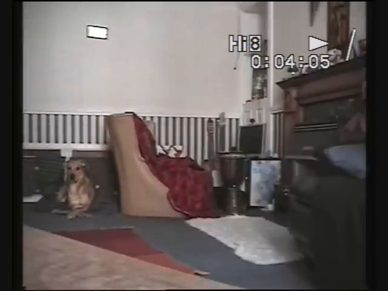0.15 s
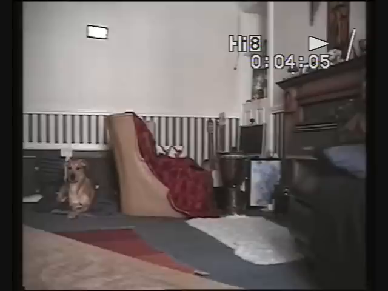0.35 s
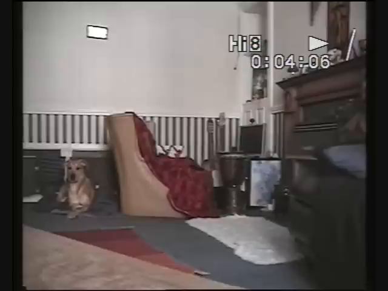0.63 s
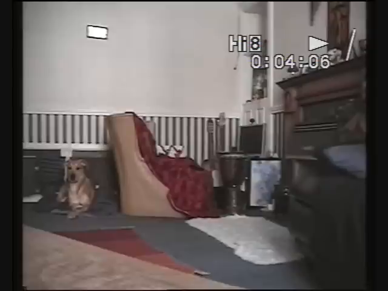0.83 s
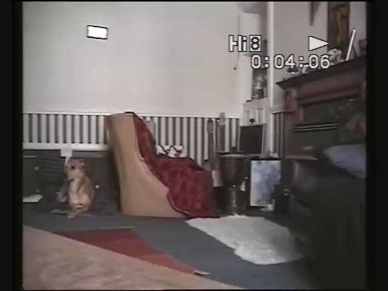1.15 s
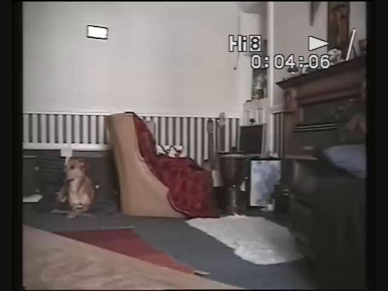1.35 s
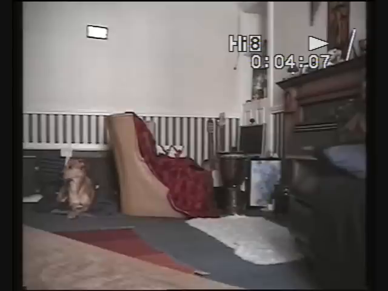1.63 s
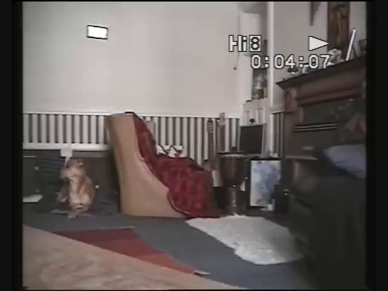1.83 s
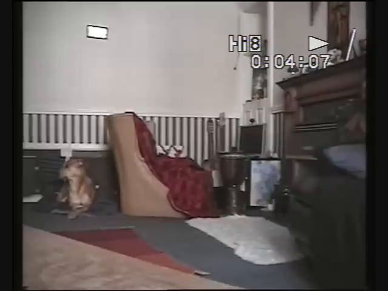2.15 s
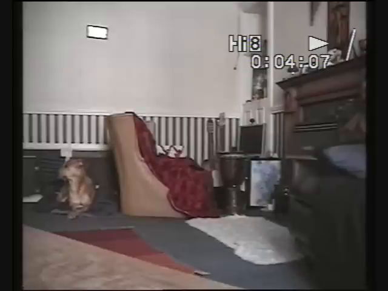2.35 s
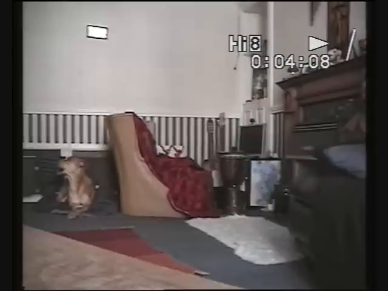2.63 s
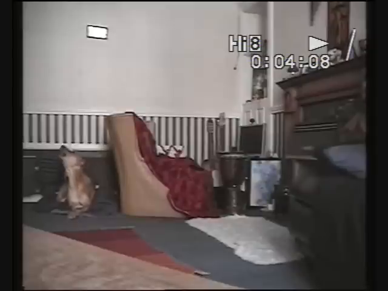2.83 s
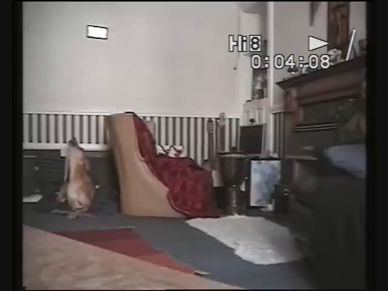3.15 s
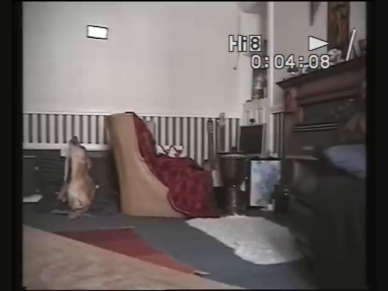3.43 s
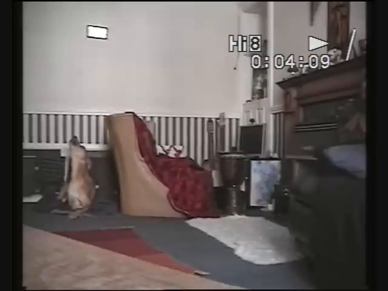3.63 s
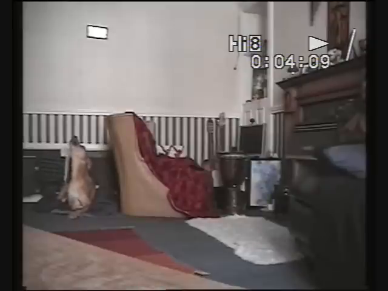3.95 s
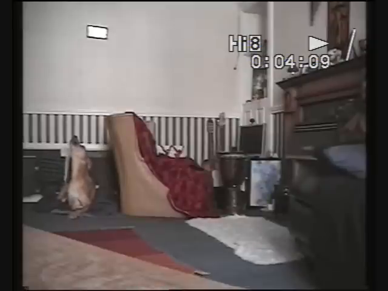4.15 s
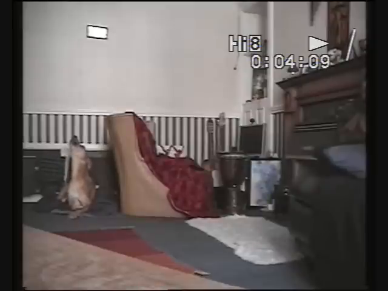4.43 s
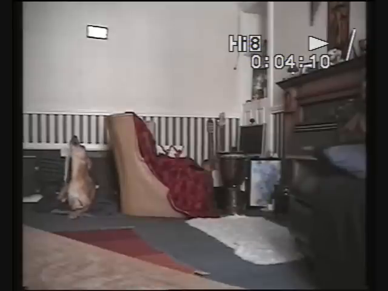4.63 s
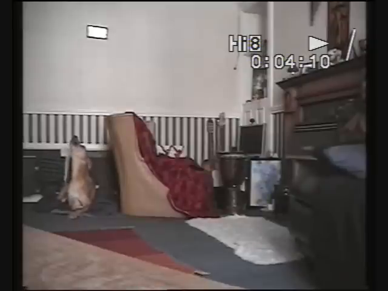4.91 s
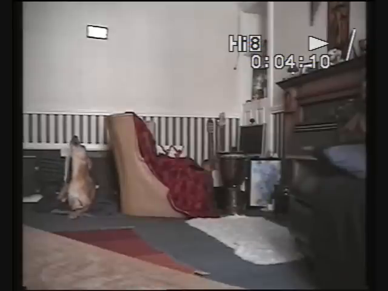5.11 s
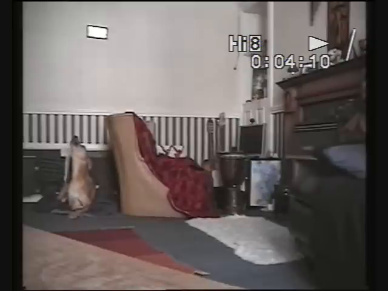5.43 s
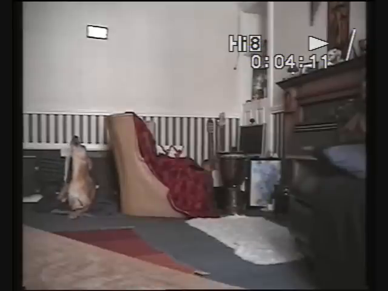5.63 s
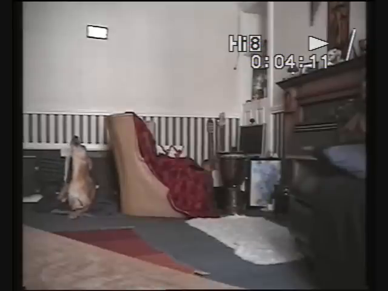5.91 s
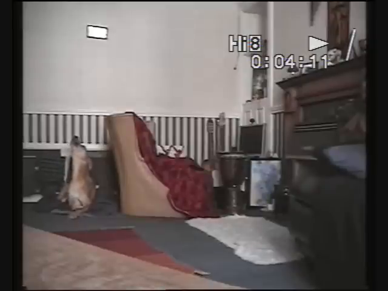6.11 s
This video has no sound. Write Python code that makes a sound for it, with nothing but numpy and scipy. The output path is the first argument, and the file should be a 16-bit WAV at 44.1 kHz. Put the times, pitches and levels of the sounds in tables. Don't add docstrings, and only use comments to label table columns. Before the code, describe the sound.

Steady tape hiss, a faint drive drone and a very high thin buzz run throughout, in the right channel, with the left almost silent. From 0 to 1.3 seconds, claws and tags tick irregularly; faint high nose whistles appear near 0.3, 0.4 and 1.1, with little whimpers around 0.65 and 1.05. Two breathy whines follow at 1.2 to 1.75, the second longer and sinking. At 1.9 a low creaky growl starts the near dog's howl, wavering, lifting slightly by 2.9, dipping, then swooping up from 3.5 to a high crest at 4 to 4.4, before falling sharply and fading at 5.1. The farther dog starts roughly at 2.6, leaps upward by 3, flutters briefly, then holds a slowly sinking note that fades until 6.3. The loudest peaks, near 2.9 to 3.2, 3.6 and 4.5, crackle with overload. A few ticks sound closer at 5.5 and 6.1. Short living-room reverberation.

```python
import sys
import numpy as np
from scipy import signal
from scipy.fft import rfft, irfft, next_fast_len
from scipy.io import wavfile
from scipy.ndimage import uniform_filter1d, minimum_filter1d

SR = 44100
rng = np.random.default_rng(int(sys.argv[2]) if len(sys.argv) > 2 else 0)


def to_linear_factor(level_db):
    exponent = np.asarray(level_db, float) / 20
    return 10 ** exponent


def bounce(signal):
    frames = np.transpose(np.atleast_2d(signal))
    limited = np.clip(frames, -1, 1)
    pcm = np.round(limited * 32767).astype(np.int16)
    wavfile.write(sys.argv[1], SR, pcm)


N = 276811

# (time [s], pitch [Hz], effort [dB], mouth opening [1 = rest], brightening pressure [dB])
GLIDING_CALL = [(1.93, 333, -59, 1, 1.5), (1.978, 335.7, -55, 1.36, -0.5), (1.988, 334.3, -39, 1.27, -2.5),
                (2.02, 334.3, -41, 1.18, -1.5), (2.045, 316, -55.5, 1.25, 15.5),
                (2.075, 308.3, -39, 0.91, 7), (2.15, 312.6, -35, 1.19, -3), (2.17, 314.8, -45.5, 0.81, 10),
                (2.25, 317.5, -41, 0.76, 5), (2.275, 322.7, -34.5, 0.94, -4),
                (2.305, 323.7, -32, 0.94, -3.5), (2.36, 322.8, -36, 0.95, 3),
                (2.48, 325.5, -39.5, 1.03, 2.5), (2.525, 336.8, -41, 1.12, 3.5),
                (2.545, 345.3, -33, 1.3, -3)]
GLIDING_LIFT = [(2.572, 354, -31, 1.045, -12), (2.61, 349.4, -41.5, 0.97, -5.5),
                (2.646, 348.6, -35, 1.03, -9), (2.686, 366.8, -25, 1.13, -14), (2.726, 374, -35, 1.39, -8),
                (2.76, 385.8, -31.5, 1.02, -1.5), (2.78, 391.3, -38, 1.16, -7.5),
                (2.81, 394.3, -33, 1.23, -3), (2.873, 399, -30.5, 1.01, -2.5),
                (2.9, 389.4, -36.5, 0.93, -3), (2.935, 366.1, -28, 0.96, -4.5),
                (2.965, 371.5, -40, 1.02, -5.5), (2.991, 361, -58, 0.82, 3)]
GLIDING_RISE = [(3.051, 339.6, -35, 0.98, -12), (3.157, 343.9, -37, 0.88, 3),
                (3.42, 337.5, -34, 0.87, -10.5), (3.501, 367.5, -25, 1.163, -11),
                (3.56, 392.6, -30.5, 0.93, -1.5), (3.624, 429.5, -27.5, 1.007, 3),
                (3.665, 445.7, -42, 1.07, -7), (3.75, 479.1, -46.5, 0.75, 2.5)]
GLIDING_CREST = [(3.859, 513.4, -47, 1.17, 8), (3.93, 552.5, -38.5, 1.06, -2),
                 (4.001, 580.7, -33.5, 0.9, -3.5), (4.089, 582.2, -37, 1.1, -3.5),
                 (4.23, 586.9, -36, 1.22, -3.5), (4.381, 590.9, -36.5, 1.11, -1.5)]
GLIDING_FALL = [(4.43, 575, -39, 1.06, 16), (4.499, 513.3, -29, 1.116, 6.5), (4.569, 449.3, -24, 1.04, -2),
                (4.61, 423.3, -28.5, 1.098, -17), (4.651, 397.5, -30, 0.95, -1.5),
                (4.705, 381, -37, 0.91, -5.5), (4.755, 365.7, -42, 1.06, -2),
                (4.81, 356, -43.5, 0.98, -2.5), (4.86, 355.5, -43, 0.96, -5.5),
                (4.945, 365.8, -45, 1.11, -1), (5.015, 384, -40.5, 0.9, 3), (5.072, 364.8, -45, 1.03, -1),
                (5.095, 370, -76.5, 1.15, -1)]
HELD_RISE = [(2.59, 263.7, -62, 0.83, -7.5), (2.64, 256.4, -44.5, 0.9, -12),
             (2.73, 252.2, -44.5, 0.94, -16.5), (2.78, 276.9, -43, 0.8, -16), (2.86, 331.4, -28, 0.93, -15),
             (2.9, 393.5, -33, 0.85, -9), (2.935, 478, -35, 1, 7.5), (2.97, 508.2, -32, 0.86, 10.5),
             (3.0, 516.5, -37, 0.89, 14.5), (3.06, 503.2, -32.5, 0.94, 6.5)]
HELD_NOTE = [(3.3, 511.3, -38, 0.94, 10.5), (3.579, 505.5, -36, 1, 8), (3.691, 503.7, -31, 1.14, 0),
             (3.81, 498.8, -32, 1.04, -2), (3.999, 487.8, -37, 1, 0.5), (4.29, 469.4, -37, 0.92, 1),
             (4.47, 464.8, -38, 0.92, 3.5), (4.571, 464, -32.5, 1.135, -13.5),
             (4.679, 469.4, -36.5, 0.9, -2.5), (4.8, 457.2, -37.5, 1.1, 1.5),
             (5.03, 450.6, -38.5, 1.16, -4.5), (5.12, 450, -37, 1.135, -6.5), (5.2, 450, -34.5, 1.196, -9)]
HELD_FADE = [(5.4, 450.3, -37, 1.196, -6.5), (5.49, 443.8, -39.5, 1.13, -8), (5.53, 442.6, -42.5, 1.28, -8),
             (5.63, 442.2, -42, 1.176, -9), (5.798, 440.7, -40.5, 1.24, -9.5),
             (5.94, 433, -47.5, 1.08, 3.5), (6.03, 427.2, -51, 0.99, 8), (6.088, 415, -41, 0.94, -7),
             (6.197, 409.5, -48, 1.33, -4), (6.279, 395, -47, 0.64, 2.5)]
UNDERTONE = [
    (2.63, 180.6, -61, 0.85, -21),
    (2.68, 189, -45.5, 0.9, -16),
    (2.74, 206, -46.5, 0.97, -21),
    (2.79, 214, -59.5, 0.9, -21),
]
# (frequency [Hz], level [dB])
GLIDING_MOUTH = [(250, -19.5), (330, -11), (420, -2), (650, 4.5), (900, -16), (1200, -13), (1500, -29.5),
                 (1800, -37.5)]
HELD_MOUTH = [(180, -14), (300, -10.5), (430, 2), (540, 1), (850, -20.5), (1050, -11.5), (1300, -21),
              (1600, -28)]
WHINE_MOUTH = [(400, -0.5), (560, -2), (680, -4), (850, -27), (1060, -21), (1300, -27.5), (1700, -42.5)]
# (frequency [Hz], level [dB])
GLIDING_THROAT = [(1200, 8), (1500, -13.5), (1900, -2), (2550, -24), (2900, -4.5), (3500, -43),
                  (4800, -32.5), (5300, -9), (5900, -23.5), (6700, -11.5), (7400, -31), (8100, -18),
                  (9000, -49)]
HELD_THROAT = [(1200, 3), (1770, -1), (2050, -21.5), (2550, -10), (3300, -10), (3650, -36.5), (4600, -45.5),
               (5100, -27), (5700, -27), (6500, -39.5), (7700, -20.5), (8300, -33.5), (8900, -38.5),
               (9500, -47.5), (12200, -54)]
WHINE_THROAT = [(1200, -12), (2100, -2), (2500, -14), (3000, 0), (3800, -42), (5400, -8.5), (6600, -7),
                (8000, -29.5)]
# (time [s], spread [s], frequency [Hz], spread [Hz], lift [dB])
GLIDING_SWELLS = [(2.12, 0.062, 1246, 120.4, 4.5), (2.84, 0.1, 1515, 130, 22.5),
                  (2.91, 0.081, 1110, 390, 11.5), (3.59, 0.21, 1223, 170, 14), (3.86, 0.055, 991, 114, 27.5),
                  (4.42, 0.029, 1174, 110, 17), (4.48, 0.011, 1567, 190, 13.5), (4.57, 0.07, 878, 53, 12),
                  (4.56, 0.13, 1788, 238, 20.5), (4.2, 0.26, 5500, 1200, -14.5), (4.47, .07, 6300, 1200, -9),
                  (2.51, 0.013, 665, 63, -1), (2.32, 0.081, 645, 70, 3), (2.14, 0.027, 625, 70, 1.5),
                  (3.163, 0.16, 343, 30, 5), (4.33, 0.11, 2940, 150, 13.5), (4.268, 0.11, 1170, 120, 6.5),
                  (2.2, 0.077, 2880, 150, 13), (2.29, 0.037, 1930, 120, 12), (2.12, 0.057, 1870, 120, -9),
                  (2.2, 0.038, 640, 70, -9), (2.2, 0.055, 950, 80, 8.5), (4.4, 0.088, 2100, 150, -11.5),
                  (3.3, 0.18, 6750, 270, 4.5), (2.56, .03, 2120, 120, 11.5), (2.4, .05, 2800, 200, -1),
                  (5.0, .05, 1500, 100, 16), (4.86, 0.061, 1075, 80, -3.5), (3.17, .08, 685, 40, 7.5),
                  (3.3, 0.19, 1020, 50, 6), (4.7, 0.032, 390, 50, 3)]
HELD_SWELLS = [(3.0, 0.05, 3080, 150, 9.5), (3.575, 0.021, 3040, 150, 8), (4.33, .14, 5160, 200, 13),
               (4.33, 0.11, 6200, 200, 10.5), (4.71, 0.06, 5150, 250, 16), (4, .08, 5480, 200, 10),
               (3.15, .2, 11500, 300, 25), (3.55, .25, 11200, 300, 19), (6.4, .12, 3100, 120, 8),
               (5.3, 0.13, 3150, 120, 5.5), (6.1, .2, 3240, 170, -14), (3.3, 0.17, 2030, 80, -10),
               (3.4, 0.044, 1600, 820, -6.5), (3.25, .2, 7650, 300, -7.5), (4.12, .25, 7650, 300, 7),
               (3.75, .15, 5520, 200, 5), (3.3, 0.17, 3800, 120, 3.5), (4.6, 0.37, 2310, 140, -11),
               (4.87, 0.067, 2750, 140, 0.5), (4.3, 0.045, 2840, 103, 17), (6.04, 0.06, 3047, 100, 20.5),
               (5.65, 0.11, 885, 80, 6.5), (5.246, 0.22, 900, 80, -10.5), (3.4, 0.068, 1780, 100, -9.5),
               (5.5, 0.27, 2650, 120, -7), (3.15, 0.079, 2040, 100, 12.5), (4.7, 0.093, 2900, 330, -16),
               (8.8, 0.11, 3230, 170, -17), (3.0, .04, 5150, 200, 7.5)]
WHINE_SWELLS = [(1.453, 0.039, 1065, 80, 8.5), (1.58, 0.027, 1000, 150, -14), (1.58, 0.028, 1450, 150, -6),
                (1.27, .04, 1850, 120, 5), (1.66, .04, 2080, 100, 9), (1.64, .06, 2950, 200, -1),
                (1.74, 0.036, 830, 80, -13)]
PRESSURE_SHARES = (0, 0.34, 0.82)
# (multiple of a third of the pitch, level [dB])
THIRDS = [(4, -63.5), (7, -57.5), (10, -65)]
# (multiple of the pitch, level under the line above [dB])
FLUTTER_LINES = [(.25, -30.5), (1.5, -16), (1.75, -14), (2.25, -15), (2.5, -20), (2.75, -18), (3.25, -28),
                 (5.75, -40), (6.25, -28.5), (6.5, -29)]
# (time [s], pulse rate [1/s], level [dB], mouth resonance [Hz])
GROWLS = [
    [(1.9, 120, -74, 410), (1.94, 158, -54, 465), (1.97, 185, -47.5, 496), (2.01, 130, -48.5, 538),
     (2.04, 130, -60.5, 517), (2.2, 140, -54.5, 480)],
    [(2.6, 140, -57, 520), (2.66, 140, -70, 510), (2.72, 410, -59.5, 505.5), (2.78, 150, -58, 499.7),
     (2.84, 230, -79, 605)],
]
# (time [s], pitch [Hz], effort [dB], mouth opening [1 = rest], brightening pressure [dB])
WHINES = [
    [(1.21, 526, -82, 1, 7), (1.25, 604, -40.5, 0.8, 10), (1.295, 664, -41.5, 0.89, 9),
     (1.32, 566.4, -45.5, 0.96, 6), (1.355, 555, -36, 0.79, -8), (1.378, 548, -43, 0.87, 4),
     (1.39, 543, -51, 0.94, 14), (1.412, 550, -47, 1, 10)],
    [(1.408, 553, -55, 1.2, 1), (1.424, 538, -39, 0.92, 0), (1.44, 538, -36.5, 0.71, -1.5),
     (1.458, 536, -43.5, 0.78, 4), (1.49, 525.8, -37.5, 1.04, -3), (1.53, 530, -54.5, 1.05, 13),
     (1.578, 490, -34.5, 0.88, 0), (1.6, 451, -36.5, 1.1, -1), (1.625, 429, -37.5, 1.05, -3.5),
     (1.64, 418, -37.5, 1.09, 1.5), (1.66, 412, -37.5, 1.08, -4.5), (1.695, 413.5, -49, 1.24, 1.5),
     (1.715, 429, -62.5, 0.78, 4), (1.75, 430, -73, 0.81, -1)],
]
# (start [s], length [s], pitch [Hz], peak level [dB])
WHIMPERS = [
    (0.646, 0.094, 427, -48),
    (.732, 0.069, 442.6, -58),
    (1.034, 0.056, 422, -45),
    (1.11, 0.044, 445, -63),
]
# (start [s], length [s], pitch [Hz], peak level [dB])
WHISTLES = [
    (0.32, 0.061, 3730, -76),
    (0.417, 0.077, 3700, -78),
    (1.082, 0.31, 3680, -75.5),
]
# (time [s], peak level [dB])
TICKS = [(0.0875, -62), (0.117, -64), (0.1496, -62), (0.174, -65), (0.316, -69), (0.4244, -64),
         (0.5901, -63), (0.6707, -63.5), (0.7023, -59.5), (0.7347, -59), (0.7644, -72), (0.8494, -70),
         (0.925, -59.5), (0.96, -62), (0.9844, -72), (1.0537, -62), (1.092, -57), (1.1244, -62),
         (1.232, -60.5), (1.266, -58)]
LATE_TICKS = [(5.53, -62), (5.56, -63), (5.615, -62), (5.67, -60), (6.125, -68), (6.178, -63)]
# (frequency [Hz], width [Hz], level [dB])
TICK_MODES = [(820, 620, -0.5), (1535, 220, 8), (1920, 410, 1.5), (2600, 150, -1), (5940, 1700, -9.5)]
# (frequency [Hz], time to fall 60 dB [s])
ROOM_T60 = [(200, 0.37), (600, 0.37), (1500, 0.46), (4000, 0.34), (9000, 0.029)]
# (time [s], spread [s], share of the crest kept [0-1])
OVERLOADS = [(2.925, 0.0042, 0.93), (2.942, 0.0048, 0.73), (3.078, 0.0034, 0.8), (3.112, 0.0019, 1),
             (3.155, 0.0027, 0.68), (3.19, 0.0029, 0.97), (3.534, 0.0082, 0.75), (3.549, 0.0031, 0.98),
             (3.587, 0.0021, 0.82), (3.604, 0.0066, 0.89), (3.619, 0.0047, 0.46), (4.48, 0.0055, 0.66),
             (4.492, 0.0047, 0.77), (4.533, 0.0045, 0.39), (4.549, 0.0033, 0.4), (4.564, 0.0055, 0.67),
             (4.579, .002, 1), (4.586, 0.0026, 0.68), (4.604, 0.0065, .66), (4.633, 0.0036, 0.68)]
# (frequency [Hz], density [dB per Hz])
HISS = [(10, -5), (20, 0.5), (55, -11), (200, -10.5), (700, -19), (1600, -21.5), (3500, -28.5), (7000, -30),
        (9500, -34), (14500, -36), (16500, -29.5)]
# (frequency [Hz], width [Hz], level [dB])
HUMS = [(635.4, 7.8, -80.5), (776, 7.1, -87.5)]
# (frequency [Hz], level [dB])
FIELD_TICK = [(6000, -40), (8000, -20), (9500, -36), (12500, -22), (13200, -28), (13700, -15), (14100, -30),
              (14500, -13), (14800, -22), (15150, -6), (15450, 0), (15750, -1), (15850, -60)]
OFFSETS = (-.00138, -.00055)


def gliding_howl():
    rows = GLIDING_CALL + GLIDING_LIFT + GLIDING_RISE + GLIDING_CREST + GLIDING_FALL
    return voice(rows, GLIDING_MOUTH, GLIDING_THROAT, upper_db=-27, jitter=0.0037, fuzz_db=-33.5,
                 breath_db=-3, swells=GLIDING_SWELLS, thirds=THIRDS)


def held_howl():
    rows = HELD_RISE + HELD_NOTE + HELD_FADE
    return voice(rows, HELD_MOUTH, HELD_THROAT, upper_db=-20, jitter=0.003, fuzz_db=-33, breath_db=-5,
                 follow=0.75, creak_hz=316, flutter=True, top_even=0.34, swells=HELD_SWELLS)


def undertone():
    return voice(UNDERTONE, HELD_MOUTH, HELD_THROAT, upper_db=-34, jitter=0.008, fuzz_db=-17, breath_db=3)


def voice(rows, mouth, throat, upper_db, jitter, fuzz_db, breath_db, follow=0.86, creak_hz=100,
          flutter=False, top_even=0, swells=(), thirds=()):
    t, (hz, effort_db, opening, press_db) = play(rows)
    creak = np.clip((creak_hz - hz) / 100, 0, 1)
    turns = np.cumsum(hz * (1 + (jitter + 0.067 * creak) * wander(len(t), 360))) / SR
    fuzz = wander(len(t), 89)
    fading = wander(len(t), 650)

    out = np.zeros(len(t))
    for k, share in enumerate(PRESSURE_SHARES, start=1):
        db = effort_db + share * press_db + read(mouth, k * hz / np.clip(opening, 0.5, 2))
        db += swelled(swells, t, k * hz)
        out += to_linear_factor(db) * np.cos(2 * np.pi * (k * turns + rng.random()))
    out *= 1 + to_linear_factor(fuzz_db + 19 * creak) * fuzz

    full_db = effort_db + press_db + upper_db
    steady_db = -65 + follow * (full_db + 65)
    glide = uniform_filter1d(abs(np.gradient(np.log(hz))) * SR, size=2000)
    steady_db = steady_db - 5.5 * np.tanh(glide / 0.8)
    for k in range(4, 26):
        shift = int(rng.random() * len(t))
        high = np.clip((k * hz - 2100) / 300, 0, 1)
        top_db = steady_db + 2.6 * np.roll(fading, shift)
        db = (1 - high) * full_db + high * top_db + read(throat, k * hz)
        db += swelled(swells, t, k * hz)
        if k > 9:
            db -= top_even * (steady_db - steady_db.mean())
        phase = 2 * np.pi * (k * turns + rng.random())
        out += to_linear_factor(db) * np.cos(phase + 0.031 * k * np.roll(fuzz, shift))

    breath = coloured(rng.standard_normal(len(t)), [(700, -29.5)] + throat)
    out += to_linear_factor(steady_db + breath_db) * breath
    if thirds:
        out += tripled(thirds, t, turns, fuzz, fading)
    if flutter:
        out += fluttering(t, turns, fuzz, fading)
    return t[0], np.sqrt(2) * out * signal.windows.tukey(len(t), min(800 / len(t), 1))


def swelled(swells, t, hz):
    lift = np.zeros(len(t))
    for s, spread_s, centre_hz, spread_hz, lift_db in swells:
        if hz.min() - 3 * spread_hz < centre_hz < hz.max() + 3 * spread_hz:
            lift += lift_db * np.exp(-((t - s) / spread_s) ** 2 - ((hz - centre_hz) / spread_hz) ** 2)
    return lift


def tripled(thirds, t, turns, fuzz, fading):
    on = np.exp(-((t - 2.434) / 0.076) ** 4) * to_linear_factor(3.4 * fading)
    return on * sum(to_linear_factor(db) * np.cos(2 * np.pi * k / 3 * (turns + 0.04 * fuzz)) for k, db in thirds)


def fluttering(t, turns, fuzz, fading):
    start, end, edge = 2.99, 3.472, 0.092
    done = np.clip((t - start) / (end - start), 0, 1)
    on = np.clip(np.minimum(t - start, end - t) / edge, 0, 1) ** 2 * to_linear_factor(2.4 * fading)
    turns = turns + 0.032 * np.roll(fading, len(t) // 2) + 0.01 * fuzz
    below = on * to_linear_factor(-33 - 21.5 * done)
    above = on * to_linear_factor(-35 - 10.5 * done)
    out = below * np.cos(2 * np.pi * turns * 3 / 4) + above * np.cos(2 * np.pi * turns * 5 / 4)
    return out + above * sum(to_linear_factor(db) * np.cos(2 * np.pi * k * turns) for k, db in FLUTTER_LINES)


def growl(rows):
    t, (rate, level_db, mouth_hz) = play(rows)
    turns = np.cumsum(rate * (1 + 0.067 * wander(len(t), 210))) / SR
    pulses = np.diff(np.floor(turns), prepend=0) * to_linear_factor(3.5 * wander(len(t), 60))
    mouth = resonate(resonate(pulses, mouth_hz, 370), mouth_hz, 360)
    mouth -= to_linear_factor(-9) * resonate(resonate(pulses, 1100, 300), 1100, 300)
    chest = to_linear_factor(-32) * resonate(resonate(pulses, rate, 90), rate, 90)
    return t[0], to_linear_factor(level_db) * evened(mouth + chest)


def whine(rows):
    return voice(rows, WHINE_MOUTH, WHINE_THROAT, upper_db=-35, jitter=0.0075, fuzz_db=-28.5,
                 breath_db=5.5, swells=WHINE_SWELLS)


def whimper(start, length, hz, db):
    place = np.array([0, 0.35, 0.55, 0.76, 1])
    effort_db = db - 33.5 * np.array([0.86, 0.18, 0.017, 0.22, 1])
    press_db = -9 + db - effort_db
    pitch = hz * (1 + 0.049 * place)
    rows = np.transpose([start + length * place, pitch, effort_db, np.ones(5), press_db])
    return voice(rows, WHINE_MOUTH, WHINE_THROAT, upper_db=-26, jitter=0.01, fuzz_db=-31, breath_db=-4)


def whistle(start, length, top_hz, top_db):
    t, (off,) = play([(start, 1), (start + 0.5 * length, 0), (start + length, 1)])
    hz = top_hz * (1 - 0.028 * off)
    level_db = top_db - 11 * off
    phase = 2 * np.pi * np.cumsum(hz * (1 + 0.0025 * wander(len(t), 200))) / SR
    return t[0], np.sqrt(2) * to_linear_factor(level_db) * (np.sin(phase) + to_linear_factor(-4) * np.sin(2 * phase))


def ticks(rows):
    scuffs = np.zeros(N)
    t = np.arange(1500) / SR
    for s, db in rows:
        add(scuffs, s, to_linear_factor(db - 60 * t / 0.024) * rng.standard_normal(1500))
    rung = sum(to_linear_factor(db) * resonate(resonate(scuffs, hz, width), hz, width) for hz, width, db in TICK_MODES)
    return to_linear_factor(12) * rung


def room(x):
    taps = np.zeros(SR)
    at = np.arange(400, SR - 20, 20)
    taps[at + rng.integers(0, 20, len(at))] = rng.choice([-1., 1.], len(at))
    hz, t, z = signal.stft(taps, SR, nperseg=256)
    fall = to_linear_factor(-60 * t / read(ROOM_T60, hz)[:, None])
    tail = signal.istft(z * fall, SR, nperseg=256)[1]
    return signal.fftconvolve(x, tail / np.linalg.norm(tail))[:N]


def shaved(x):
    t = np.arange(N) / SR
    crest = uniform_filter1d(-minimum_filter1d(-x, size=300), size=150)
    kept = 1.1 - sum((1.1 - share) * np.exp(-((t - s) / ds) ** 2) for s, ds, share in OVERLOADS)
    sag = 0.023 * uniform_filter1d(np.maximum(0.9 - kept, 0), int(0.0051 * SR))
    over = x - kept * crest
    soft = 0.008
    cut = 0.56 * soft * np.logaddexp(0, over / soft) + 0.25 * np.maximum(over, 0)
    return x - sag - cut * np.clip((1.1 - kept) * 10, 0, 1)


def limited(x):
    x = shaved(x - 0.072 * x ** 2)
    limit = np.where(x > 0, 0.3, 0.235)
    knee = 7
    x = x / (1 + abs(x / limit) ** knee) ** (1 / knee)
    return signal.lfilter(*signal.butter(1, 20, "high", fs=SR), x)


def tape_hiss():
    hiss = to_linear_factor(-67.5) * evened(coloured(rng.standard_normal(N), HISS))
    for hz, width, db in HUMS:
        hiss += to_linear_factor(db) * evened(resonate(rng.standard_normal(N), hz, width))
    return hiss


def picture_buzz():
    line_hz, field_hz, first_field = 15625, 50, 0.0142
    field = np.zeros(N)
    field[np.round(np.arange(first_field, N / SR, 1 / field_hz) * SR).astype(int)] = 1
    odd_even = field * np.where(np.cumsum(field) % 2, 1, -1)
    field_ticks = evened(coloured(odd_even, FIELD_TICK))
    snow = evened(resonate(resonate(rng.standard_normal(N), 15500, 500), 15500, 500))
    gap = np.convolve(field, np.hanning(90))[:N]
    line = np.sqrt(2) * np.sin(2 * np.pi * line_hz * np.arange(N) / SR)
    line *= (1 - 0.25 * gap) * to_linear_factor(0.3 * wander(N, 900))
    return to_linear_factor(-71.3) * line + to_linear_factor(-76.5) * field_ticks + to_linear_factor(-85) * snow


def unplugged_input(live, buzz):
    rumble = evened(coloured(rng.standard_normal(N), [(5, 2), (40, -5.5), (150, -28.5), (400, -55.5)]))
    beep = np.sin(2 * np.pi * 8000 * np.arange(N) / SR)
    leaks = to_linear_factor(-74.5) * live + to_linear_factor(-22.5) * buzz
    return to_linear_factor(-93.5) * rumble + to_linear_factor(-100) * beep + leaks + to_linear_factor(-112) * rng.standard_normal(N)


def evened(x):
    return x / np.sqrt(np.mean(x ** 2) + 1e-20)


def read(points, hz):
    f, value = np.transpose(points)
    return np.interp(np.log(hz + 1), np.log(f + 1), value)


def add(mix, s, sound):
    part = mix[round(s * SR):][:len(sound)]
    part += sound[:len(part)]


def play(rows):
    s, *columns = np.transpose(rows)
    t = np.arange(s[0], s[-1], 1 / SR)
    return t, [np.interp(t, s, c) for c in columns]


def wander(length, smooth):
    noise = rng.standard_normal(length)
    return evened(uniform_filter1d(uniform_filter1d(noise, int(smooth)), int(smooth)))


def resonate(x, hz, width):
    turn = np.exp(2j * np.pi * np.cumsum(hz * np.ones(len(x))) / SR)
    r = np.exp(-np.pi * width / SR)
    return 2 * (turn * signal.lfilter([1 - r], [1, -r], x / turn)).real


def coloured(x, spectrum):
    size = next_fast_len(len(x), True)
    gain = to_linear_factor(read(spectrum, np.fft.rfftfreq(size, 1 / SR)))
    return irfft(rfft(x, size) * gain, size)[:len(x)]


def scene():
    near, far, low = np.zeros((3, N))
    add(near, *gliding_howl())
    add(far, *held_howl())
    add(far, *undertone())
    add(near, *growl(GROWLS[0]))
    add(far, *growl(GROWLS[1]))
    for rows in WHINES:
        add(low, *whine(rows))
    for row in WHIMPERS:
        add(low, *whimper(*row))
    for row in WHISTLES:
        add(far, *whistle(*row))
    far += ticks(TICKS)
    direct = near + far + low + ticks(LATE_TICKS)
    heard = direct + to_linear_factor(-10.5) * room(near) + to_linear_factor(-12.5) * room(far) + to_linear_factor(-13) * room(low)
    return np.array([0 * heard, 2 * heard])


def top_cut(x):
    return signal.sosfilt(signal.butter(12, 15765, fs=SR, output="sos"), x)


def record(dry):
    buzz = picture_buzz()
    noisy = limited(dry[1]) + 2 * (tape_hiss() + buzz)
    live = coloured(noisy, [(15760, 0), (15800, -70)])
    both = np.array([unplugged_input(live, buzz), live]) + np.array(OFFSETS)[:, None]
    return top_cut(both)


dry = scene()
out = record(dry)
bounce(out)
```